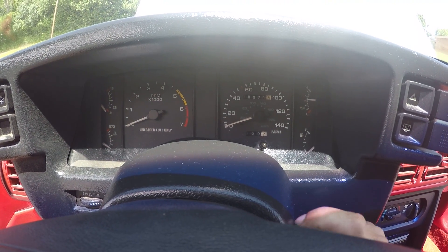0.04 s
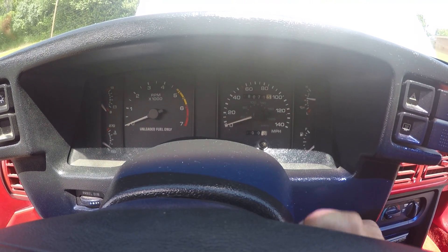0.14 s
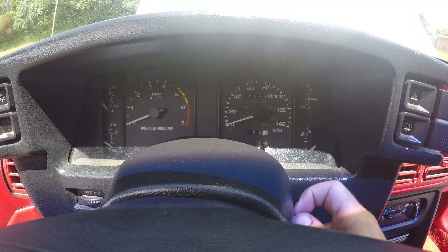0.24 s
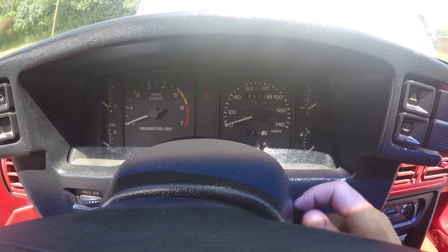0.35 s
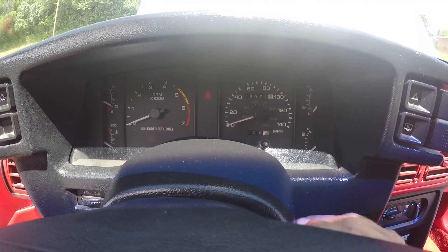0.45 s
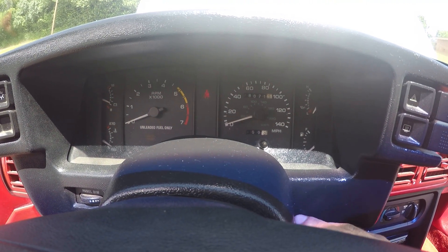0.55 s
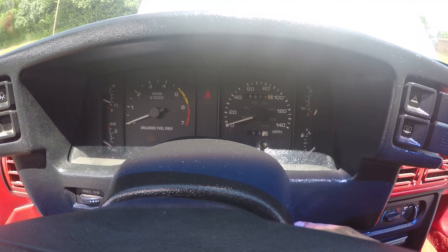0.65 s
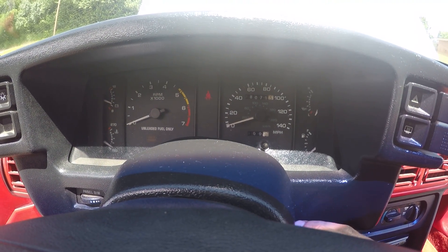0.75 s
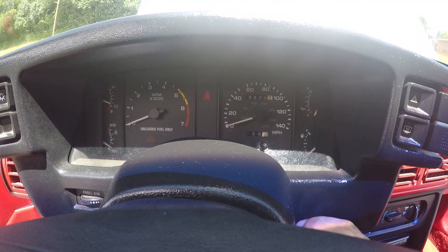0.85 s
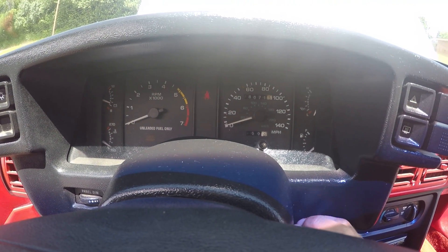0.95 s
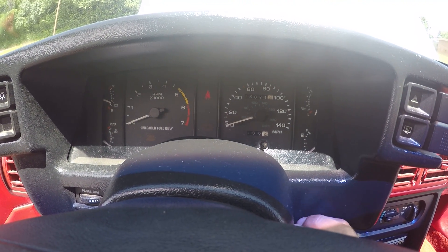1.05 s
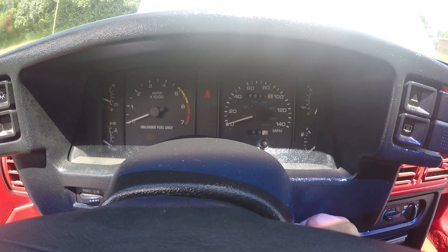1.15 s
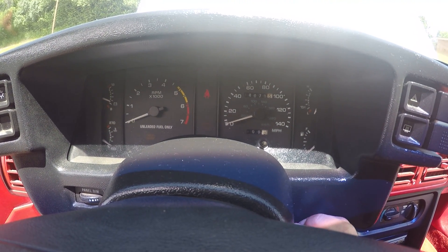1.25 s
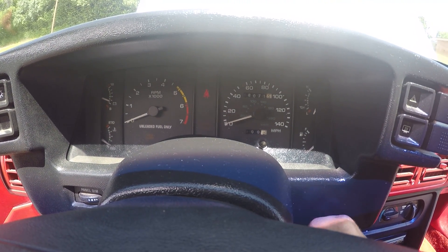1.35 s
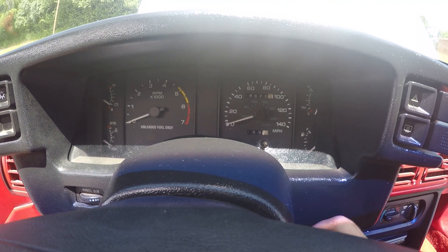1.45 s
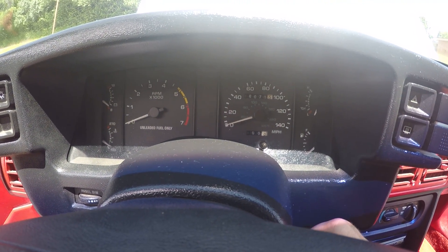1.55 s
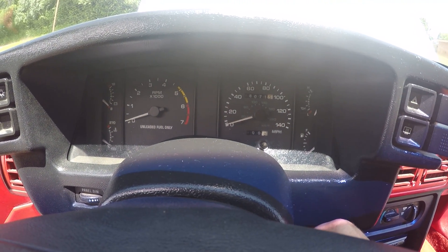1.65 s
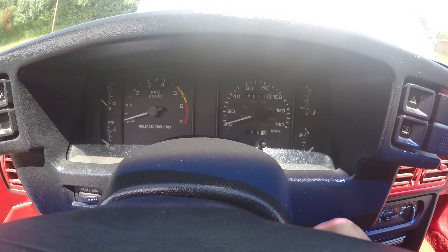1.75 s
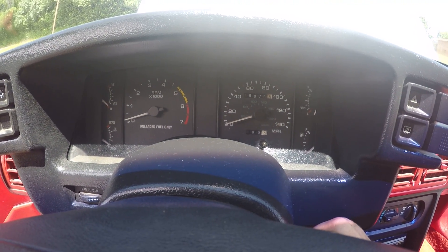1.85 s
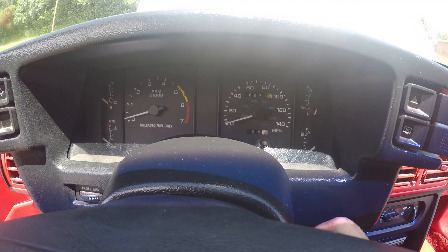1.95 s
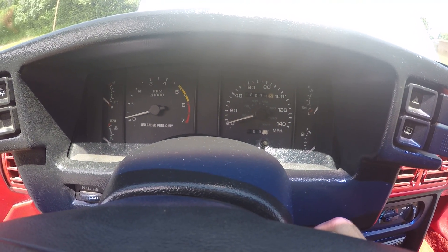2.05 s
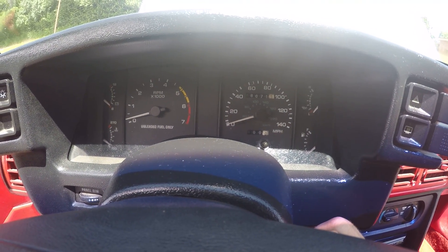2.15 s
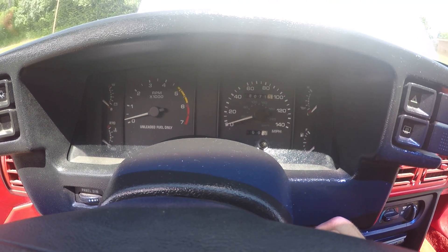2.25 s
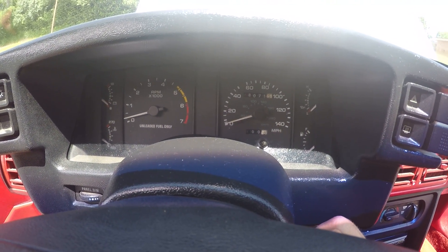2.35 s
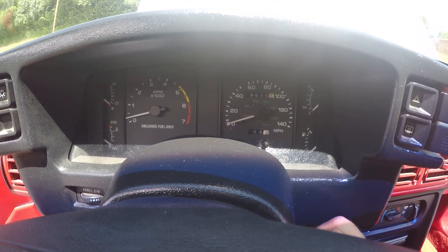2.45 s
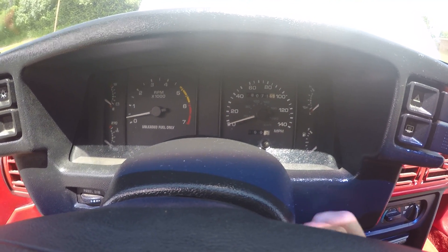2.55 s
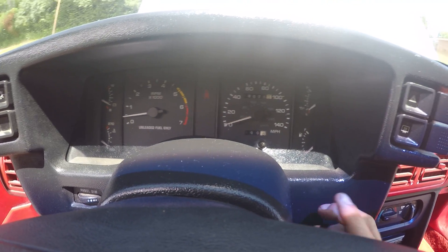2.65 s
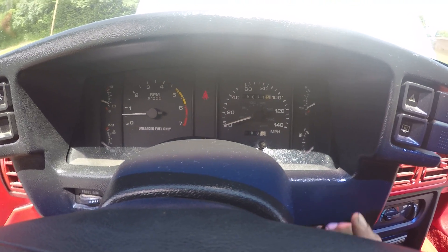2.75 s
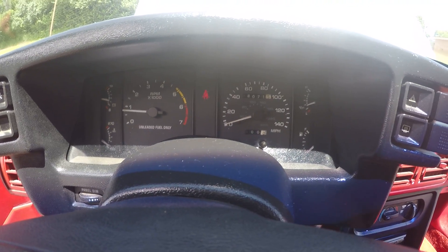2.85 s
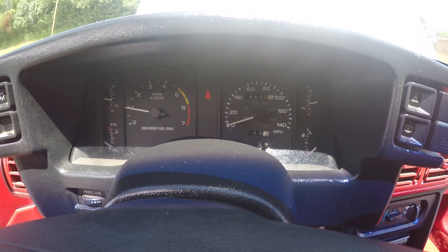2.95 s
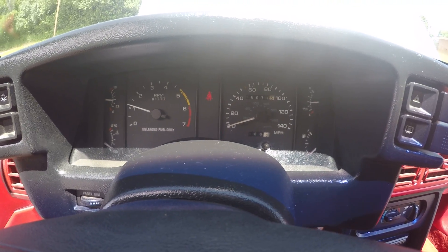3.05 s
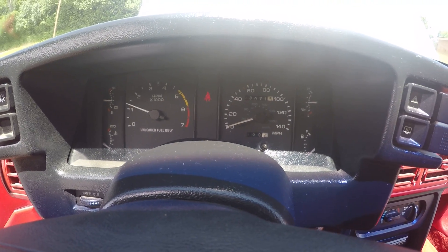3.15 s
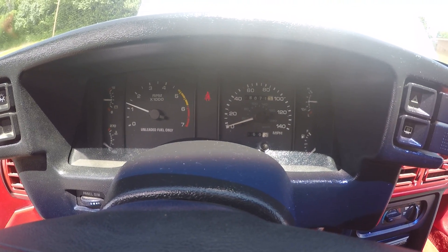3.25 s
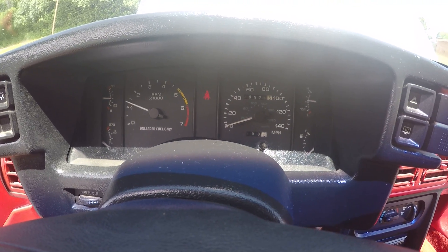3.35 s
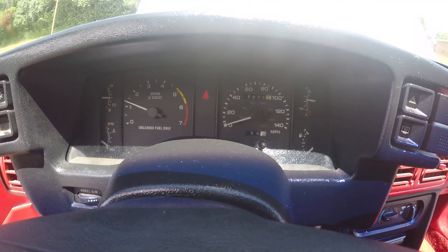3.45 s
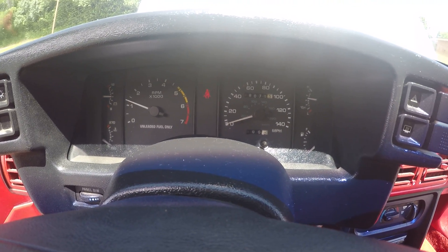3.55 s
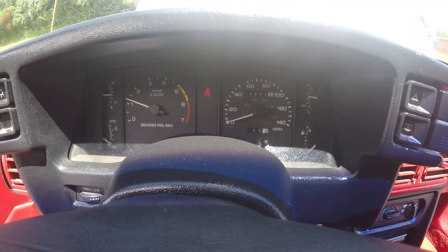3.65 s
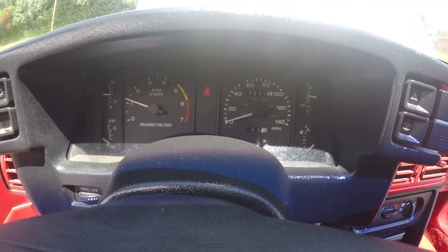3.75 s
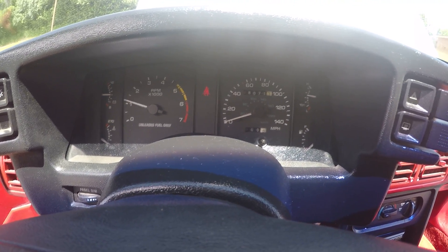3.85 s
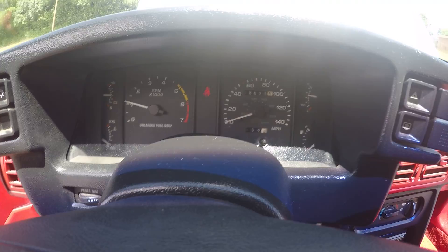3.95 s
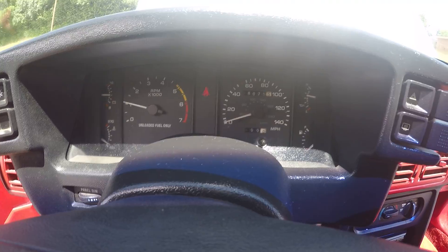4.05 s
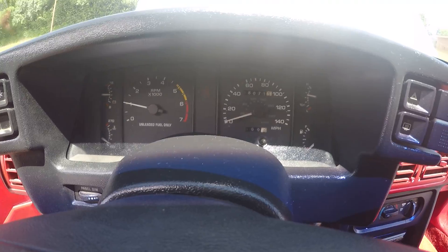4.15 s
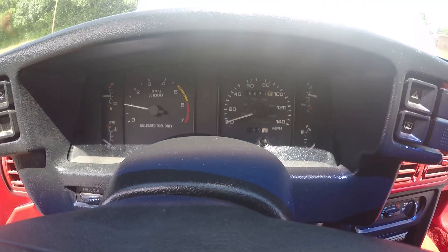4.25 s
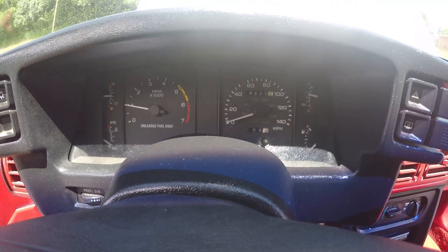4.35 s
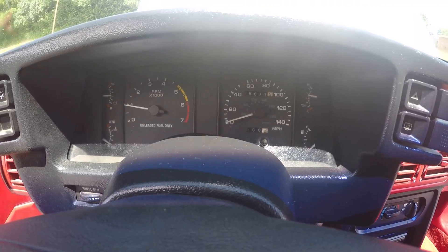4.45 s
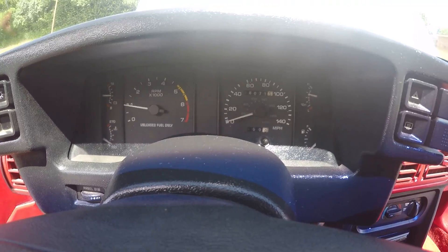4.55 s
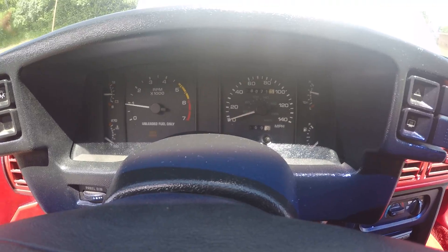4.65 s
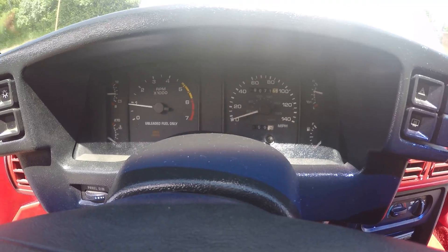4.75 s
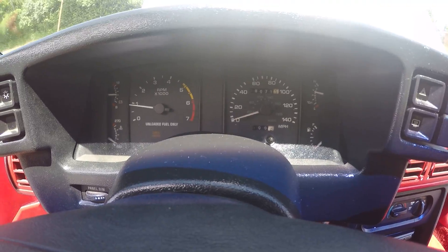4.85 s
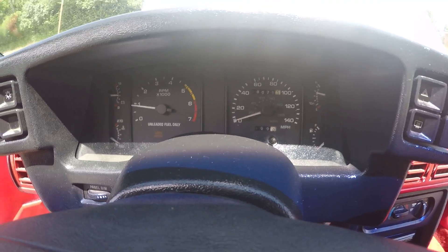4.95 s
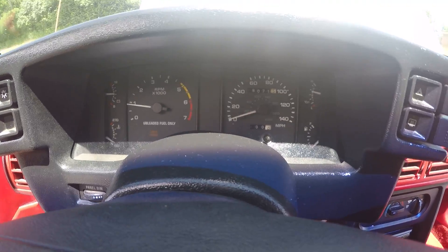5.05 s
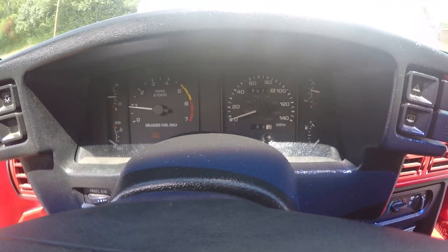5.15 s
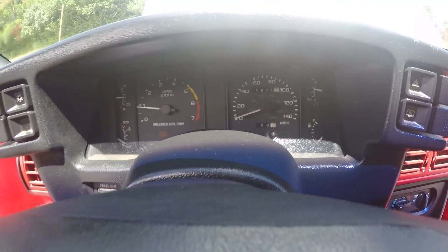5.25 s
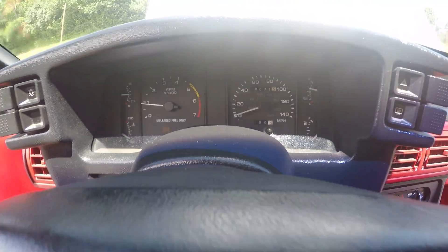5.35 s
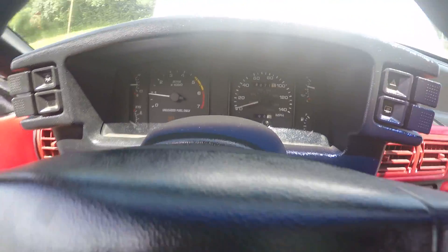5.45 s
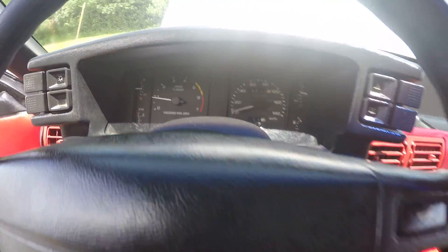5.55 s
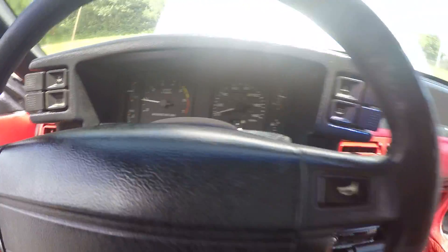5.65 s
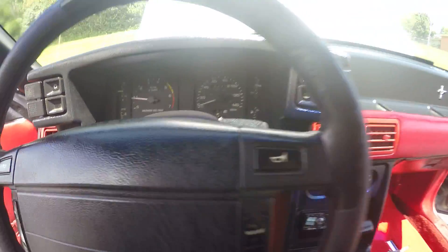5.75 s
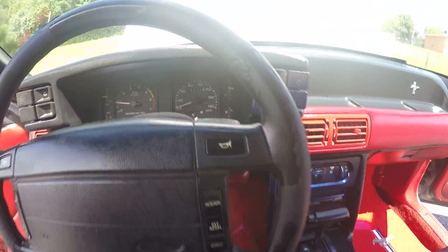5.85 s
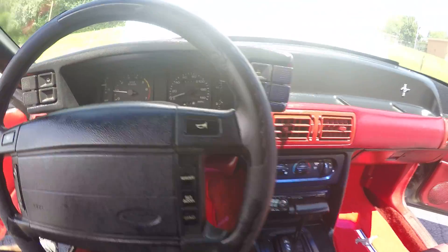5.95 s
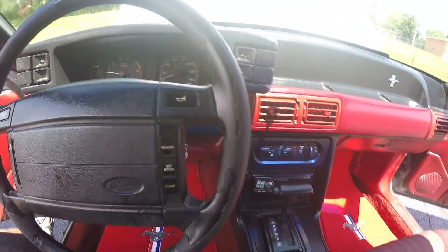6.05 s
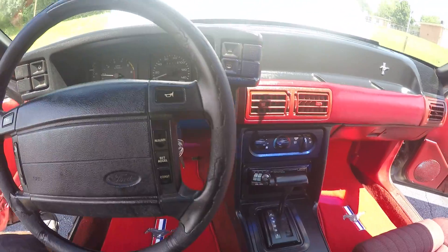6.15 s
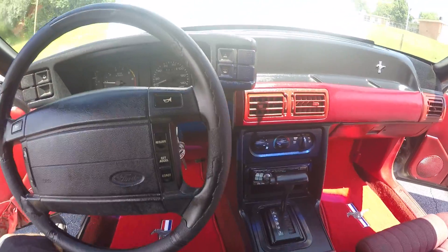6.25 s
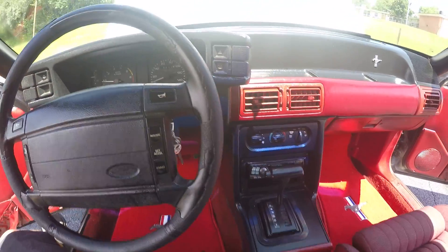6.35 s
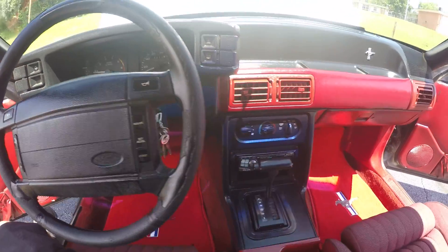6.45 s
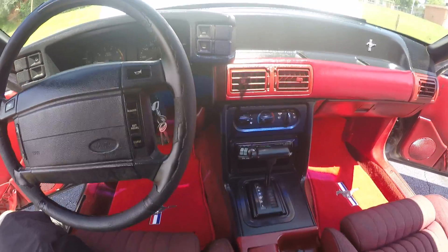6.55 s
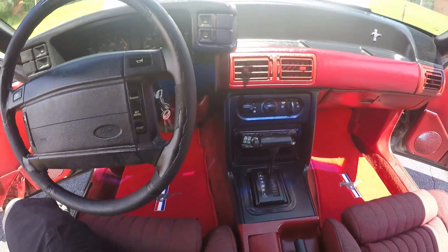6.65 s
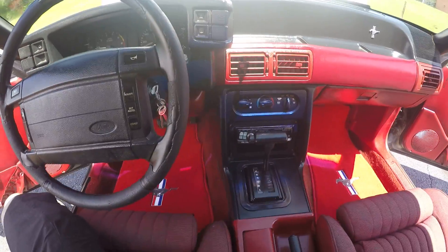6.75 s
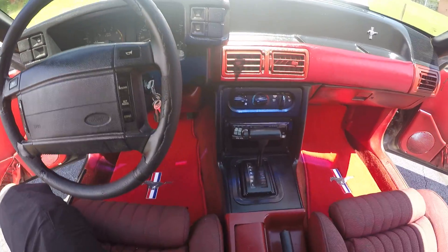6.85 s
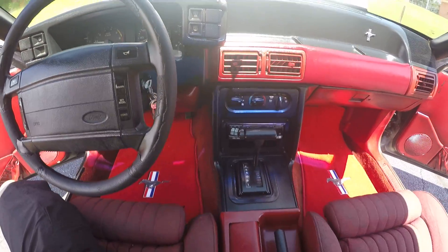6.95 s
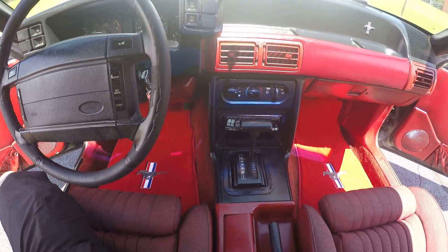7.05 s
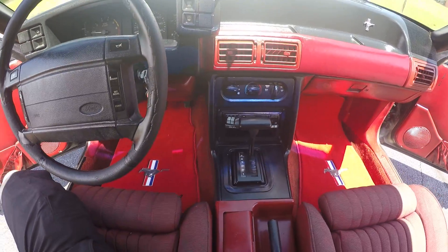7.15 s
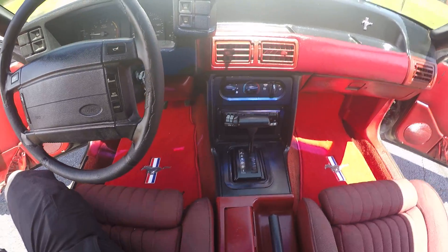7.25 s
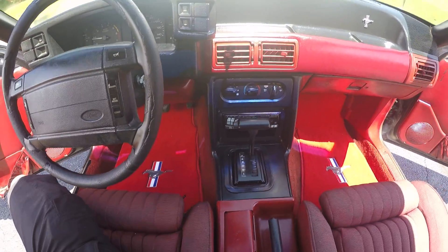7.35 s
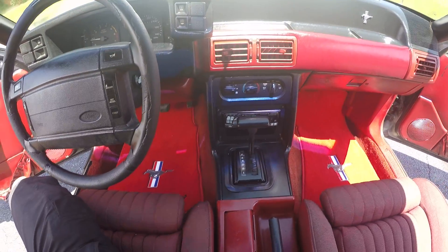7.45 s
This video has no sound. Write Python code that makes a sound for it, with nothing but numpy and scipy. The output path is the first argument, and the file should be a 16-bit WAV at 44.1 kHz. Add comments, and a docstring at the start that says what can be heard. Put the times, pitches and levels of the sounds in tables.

```python
"""A V8 is started, heard from the driver's seat with a door open.
Keys ring in modes and filtered noise rasps into the lock over a low throbbing hum; clicks are noise bursts.
The starter clunks in and grinds for a second: harmonics of meshing teeth plus scraping noise.
The engine coughs, catches, flares and sinks to a loping idle: firing tones and pulses ringing the pipe.
Faint chirps, a brush of the hand and light handling ticks at the microphone follow."""
import sys
import numpy as np
from scipy import signal
from scipy.fft import rfft, irfft, next_fast_len
from scipy.io import wavfile
from scipy.ndimage import uniform_filter1d

SR = 44100
rng = np.random.default_rng(int(sys.argv[2]) if len(sys.argv) > 2 else 0)


def file_out(sig):
    """Save sig as 16-bit WAV at sys.argv[1]."""
    # one column per channel
    cols = np.atleast_2d(sig).T
    # limit, then scale
    lim = np.clip(cols, -1, 1)
    pcm = np.round(lim * 32767).astype(np.int16)
    wavfile.write(sys.argv[1], SR, pcm)


N = 331191
T = np.arange(N) / SR
HZ = np.fft.rfftfreq(N, 1 / SR)
CUT_HZ = 15600  # upper band limit


def amp(db):
    """Turns dB into a linear gain."""
    return 10 ** (np.asarray(db) / 20)


def unit(x):
    """Scales to rms 1."""
    return x / np.sqrt(np.mean(x ** 2) + 1e-20)


def curve(rows):
    """Joins (s, value) points along time."""
    return np.interp(T, *np.transpose(rows))


def ramp(start, end):
    """Goes from 0 at start to 1 at end; with end before start it fades out."""
    return np.clip((T - start) / (end - start), 0, 1)


def swell(s, fall_s):
    """A smooth bump of height 1 at time s, down to 1/e at fall_s to either side."""
    return np.exp(-((T - s) / fall_s) ** 2)


def colour(points, hz=HZ):
    """Gain of a spectrum given as (Hz, dB) points."""
    f, db = np.transpose(points)
    return amp(np.interp(np.log(hz + 1), np.log(f + 1), db))


def peaks(modes):
    """Gain of steep-sided resonances given as (Hz, width Hz, dB)."""
    gain = 0
    for f, width, db in modes:
        detuning = (HZ ** 2 - f ** 2) / (width * (HZ + f))
        gain = gain + amp(db) / (1 + detuning ** 2 * 2) ** 1.5
    return gain


def causal(gain):
    """Gives a gain curve the phase of a body that rings after it is struck."""
    cepstrum = irfft(np.log(np.maximum(gain, gain.max() * 1e-5)), N)
    fold = 1 + np.sign(N / 2 - np.arange(N)) * (T > 0)  # doubles the causal half, drops the other
    return np.exp(rfft(cepstrum * fold))


def shaped(x, gain):
    """Filters x by a gain curve."""
    size = next_fast_len(N + SR // 2)
    response = np.interp(np.fft.rfftfreq(size, 1 / SR), HZ, gain)
    return irfft(rfft(x, size) * response, size)[:N]


def noise(gain):
    """Noise of rms 1 with the given spectrum."""
    return unit(shaped(rng.standard_normal(N), gain))


def wander(hz):
    """Slow chance of rms 1, up to about the given rate."""
    f = np.fft.rfftfreq(16384, 1 / 2000)
    slow = irfft(rfft(rng.standard_normal(16384)) / (1 + (f / hz) ** 4))
    return unit(np.interp(T * 2000, np.arange(len(slow)), slow))


def levelled(x, size=SR // 7):
    """Holds the rms near 1 and keeps flutter quicker than the window of size samples."""
    return x / np.sqrt(abs(uniform_filter1d(x ** 2, size=size)) + 1e-12)


def add(mix, s, sound):
    """Mixes a sound in at time s."""
    part = mix[max(round(s * SR), 0):][:len(sound)]
    part += sound[:len(part)]


# Faint outdoor air through the open door. Each row: frequency in Hz, level in dB.
AIR_COLOUR = [(41, -34), (70, -9.5), (129, -19.5), (325, -26.5), (478, -38.5), (1100, -42), (15500, -71)]
AIR_DB = -39


def surroundings(hum_hz=57.95, beat_hz=8.5, beat=0.32, throb_db=-36, hum_db=-28):
    """A wavering hum, pulsing about eight times a second, over a resonant low throb and faint outdoor air."""
    hum = np.sqrt(2) * np.sin(2 * np.pi * np.cumsum(hum_hz * (1 + 0.007 * wander(10.5))) / SR)
    hum *= 1 + beat * np.sin(2 * np.pi * np.cumsum(beat_hz * (1 + 0.2 * wander(2.5))) / SR)
    hum *= amp(hum_db) * ramp(2.6, 1.16)
    throb = noise(peaks([(46.7, 11, 4.0), (28, 9.0, -4.5), (109, 25, -6.5), (163.0, 28, -13), (228.5, 25, -14)]))
    return hum + amp(throb_db) * throb + amp(AIR_DB) * noise(colour(AIR_COLOUR))


# Keys knocking on their ring, close by.
# Each row: start in seconds, relative level in dB, frequency struck hardest in Hz, ring length as a share.
JINGLES = [(0.02, -32, 10500, 0.47), (0.12, -50, 5860, 1.3), (0.182, -35, 11000, .6),
           (.243, -27, 11600, 0.55), (.326, -18.5, 14000, 1.4), (0.406, -26.5, 14000, 0.8),
           (0.437, -19.5, 11500, 0.76), (0.455, -26, 11600, 1.25), (0.595, -34, 7400, 0.69),
           (0.654, -31.5, 11600, 1), (0.719, -25.5, 5600, 0.47), (0.819, -25.5, 7440, 0.4),
           (0.967, -36, 6350, 1.2), (1.006, -28, 11800, 0.51), (1.155, -57, 7000, 0.67)]
# Ringing modes of the keys. Each row: frequency in Hz, level in dB, seconds to fall 60 dB at full ring length.
KEY_MODES = [(2140, -26, 0.12), (2342, -7, 0.1), (5540, -8, 0.12), (5710, -6, 0.13), (6380, -11.5, 0.28),
             (6950, -14, .15), (7250, -6, 0.22), (7450, -5, 0.19), (10900, -8, .09), (11560, -0.5, .12),
             (11500, -7, 0.14), (13980, -5, 0.11), (14350, -12, .1)]
# Colour of the blade sliding into the lock. Each row: frequency in Hz, level in dB.
SLIDE_COLOUR = [(240, -46), (400, -7.5), (496, 0.5), (928, -11.5), (7210, -16.5), (8530, -27),
                (11800, -15.5), (15500, -26)]
# The key blade rasps over the pins.
# Each row: centre in seconds, seconds to fall to 1/e, dB over its steady scraping.
RASPS = [(0.253, 0.036, 23.4), (0.464, 0.024, 18.3)]
SCRAPE_DB = -50.5
SWAY_COUNT, SWAY_DB = 16, -48.5  # the bunch sways, and keys touch lightly between knocks (dB relative)


def keys(ring_db=-11, spread_db=4.5, detune=0.001, chatter_s=.012, bounce_db=-7, tick_db=-9,
         tick_t60=0.061, grain_db=3, focus_db=7, focus_octaves=0.083):
    """At each knock the keys bounce and ring their modes unevenly; the blade scrapes into the lock."""
    out, knocks, t = np.zeros(N), np.zeros(N), T[:SR // 3]
    hz, mode_db, t60 = np.transpose(KEY_MODES)[:, :, None]
    touches = []
    for s, which in rng.random((SWAY_COUNT, 2)):
        struck_hz = KEY_MODES[int(which * len(KEY_MODES))][0]
        touches.append((s * JINGLES[-1][0], SWAY_DB, struck_hz, 1))
    attack = 1 - np.exp(-t / 0.00037)
    for s, db, struck_hz, length in list(JINGLES) + touches:
        struck_db = mode_db + focus_db * np.exp(-(np.log2(hz / struck_hz) / focus_octaves) ** 2)
        for bounce in range(3):
            size, shift, phase = rng.standard_normal((3, len(KEY_MODES), 1))
            decay = amp(struck_db + spread_db * size - 60 * t / (t60 * length))
            ring = np.sin(2 * np.pi * (hz * (1 + detune * shift) * t + phase)) * decay
            when = s + bounce * chatter_s * rng.uniform(0.43, 1.6)
            level = amp(db + ring_db + bounce * bounce_db)
            add(out, when, level * ring.sum(0) * attack)
            add(knocks, when, level * amp(tick_db - 60 * t / tick_t60))
    # noise stands in for the many short-lived modes
    shimmer = knocks * noise(colour([(1500, -25), (5500, 6), (9000, -1), (12000, 6), (16000, -14)]))
    rasp = unit(noise(colour(SLIDE_COLOUR)) * amp(grain_db * wander(270)))
    pressure_db = SCRAPE_DB + sum(db * swell(s, fall_s) for s, fall_s, db in RASPS)
    return out + shimmer + rasp * amp(pressure_db) * ramp(0.18, 0.182) * ramp(0.59, 0.548)


# Lock, solenoid and pinion clicks.
# Each row: time in seconds, relative level in dB, brightness in dB per octave.
CLICKS = [(0.079, -41.5, -0.5), (0.197, -27, -8.5), (0.225, -27.5, -3), (0.301, -23.5, 5.5),
          (0.317, -25.5, -6), (0.356, -27, -2.5), (0.49, -27, -5.5), (0.514, -24.5, -4.5), (0.524, -19, -4),
          (0.551, -28, -17), (0.574, -24, -4), (0.633, -32, 14), (0.666, -26, 2), (0.671, -16, -1.5),
          (0.675, -22.5, -2.5), (0.716, -28, 12), (0.812, -42, 7), (0.818, -22.5, -4), (0.869, -29, 11),
          (0.93, -33.5, 3.5), (0.964, -30, -5.5), (1.103, -33.5, -3), (1.121, -37, -2.5),
          (1.405, -33.5, 3.5), (1.458, -30, -2.5), (2.641, -20, 7.5), (2.645, -19, 2.5)]
# Colour that the clicks share. Each row: frequency in Hz, level in dB.
CLICK_COLOUR = [(250, -39), (550, 1.5), (1100, 0.5), (3000, -1), (9000, -18.5), (15000, -22.5)]


def clicks(click_db=-1, light_touch=0.19, rise_s=0.001085, t60=0.042, treble_t60=0.03, touch_db=-15,
           touch_s=0.0027, tail_db=-26, tail_t60=0.18):
    """Parts rub for an instant, then snap; the treble dies before the body of the lock or trim."""
    out, lead_s = np.zeros(N), .02
    t = T[:SR // 5] - lead_s
    hz = np.fft.rfftfreq(len(t), 1 / SR)
    before, after = np.minimum(t, 0), np.maximum(t, 0)
    low = 1 / (1 + (hz / 2800) ** 4)
    onset = np.exp(before / rise_s) + amp(touch_db) * np.exp(before / touch_s)
    tail = amp(tail_db - 60 * after / tail_t60)
    loudest_db = np.max(CLICKS, axis=0)[1]
    for s, db, bright_db in CLICKS:
        gain = colour(CLICK_COLOUR, hz) * amp(bright_db * np.log2(np.clip(hz, 700, 9000)))
        spectrum = rfft(rng.choice([-1, 1], len(t))) * unit(gain)
        length = amp(light_touch * (db - loudest_db))  # lighter clicks die sooner
        crack = 0
        for band, ring_s in ((low, t60), (1 - low, treble_t60)):
            decay = amp(-60 * after / (ring_s * length)) + tail
            crack = crack + irfft(spectrum * band, len(t)) * decay
        add(out, s - lead_s + rise_s, amp(db + click_db) * crack * onset)
    return out


def fumbling(ticks_per_s=80, fumble_db=-46, spread_db=4, t60=0.037):
    """The key and its fob tap lightly and at random against the lock: decaying bursts of coloured noise."""
    taps = (rng.random(N) < ticks_per_s / SR) * amp(spread_db * np.clip(rng.standard_normal(N), -2, 2))
    fade = signal.fftconvolve(taps, amp(-60 * T[:SR // 10] / t60))[:N]
    plastic = noise(colour([(200, 0), (500, 1), (900, 7), (1600, -2), (3500, -3.0), (9000, -13), (15000, -18)]))
    return amp(fumble_db) * unit(fade * plastic) * ramp(0.171, 0.179) * ramp(1.28, 0.51)


def teeth(turns, flutter_db, count):
    """Harmonics of meshing teeth; each one flutters as the contact shifts."""
    total = np.zeros(N)
    for k in range(1, count):
        total += np.cos(2 * np.pi * (k * turns + rng.random())) * amp(flutter_db * wander(19.6))
    return unit(total)


def bay_reflections(x, wet_db, t60):
    """Dense, short reflections in the engine bay smear x."""
    t = T[:SR // 4]
    tail = rng.standard_normal(len(t)) * amp(-60 * t / t60) * (t > .002)
    return x + amp(wet_db) * signal.fftconvolve(x, tail / np.linalg.norm(tail))[:N]


# Colour of the starter's housing and the bulkhead. Each row: frequency in Hz, level in dB.
STARTER_BODY = [(200, -10), (350, -5.5), (460, -7.5), (600, -1), (750, -8.5), (900, 1), (1070, 1),
                (1250, -6.5), (1800, -6), (2300, -6), (2900, -7.5), (4100, -5.5), (7600, -23.5),
                (11000, -36), (15500, -47)]
# What the housing rings with, over that colour. Each row: frequency in Hz, width in Hz, level in dB.
STARTER_RINGS = [(996, 28, -5), (1070, 44, 0), (2302, 39, -10), (4071, 60, -10)]
# Each compression stroke drags the starter down, less so as it spins up.
# Each row: time in seconds, mean teeth meshing per second.
STARTER_SPEED = [(1.48, 250), (1.55, 312), (1.58, 360), (1.62, 346), (1.672, 224), (1.7, 224), (1.75, 412),
                 (1.815, 326), (1.855, 498), (1.885, 478), (1.915, 426), (1.945, 572), (2.012, 588),
                 (2.065, 402), (2.115, 512), (2.15, 462), (2.195, 556), (2.26, 596), (2.29, 558),
                 (2.35, 596), (2.41, 510), (2.46, 640), (2.65, 680), (2.9, 430)]
REFERENCE_HZ = 580  # teeth per second at which grind and fizz have their stated level
UNSTEADY, UNSTEADY_HZ = .02, 45  # wobble of the starter's speed: share, rate in Hz
BAY_WET_DB, BAY_T60 = 1, .1  # reflections in the engine bay: dB, seconds to fall 60 dB
TOOTH_FLUTTER_DB, SHAFT_DB = 5, -2  # the teeth meet unevenly; the motor shaft adds its own whine


def starter(grit=0.4, grind_grit=0.63, rattle_db=1.5, whine_db=-29.0, grind_db=-29, fizz_db=-42.5,
            grind_db_per_octave=5, fizz_db_per_octave=10,
            whine_free_db=-5.0, grind_free_db=-7.0, fizz_free_db=-1):
    """Pinion and ring gear whine and scrape, harsher the faster they turn, then softer as they run free."""
    hz = uniform_filter1d(curve(STARTER_SPEED), size=SR // 80)
    octaves = np.log2(hz / REFERENCE_HZ)
    free = ramp(2.37, 2.41)
    turns = np.cumsum(hz * (1 + UNSTEADY * wander(UNSTEADY_HZ))) / SR
    gear = teeth(turns, TOOTH_FLUTTER_DB, count=15)
    shaft = amp(SHAFT_DB) * teeth(turns / 3, TOOTH_FLUTTER_DB, count=34)
    lines = unit(bay_reflections(gear + shaft, BAY_WET_DB, BAY_T60)) * (1 - 0.59 * free)
    contact = 1.4 + np.exp(-(turns % 1) / 0.26)  # each tooth scrapes hardest as it meets
    scrape = 2 * unit(rng.standard_normal(N) * contact * amp(rattle_db * wander(68)))
    body = colour(STARTER_BODY) * (1 + peaks(STARTER_RINGS))
    low, high = 1 / (1 + (HZ / 1400) ** 8), 1 - 1 / (1 + (HZ / 6000) ** 8)
    whine = levelled(shaped(lines + grit * scrape, body * low))
    whine = whine * amp(whine_db + whine_free_db * free)
    grind = levelled(shaped(lines + grind_grit * scrape, body * (1 - low - high)))
    grind = grind * amp(grind_db + grind_db_per_octave * octaves + grind_free_db * free)
    fizz = unit(shaped(scrape, body * high))
    fizz = fizz * amp(fizz_db + fizz_db_per_octave * octaves + fizz_free_db * free)
    meshed = ramp(2.728, 2.678)  # the pinion pulls out, and the motor coasts on
    return (whine * ramp(2.87, 2.58) + (grind + fizz) * meshed) * ramp(1.47, 1.49)


def solenoid(clunk_db=-13, t60=0.14):
    """The pinion slams into the ring gear: one decaying burst of coloured noise."""
    gain = colour([(60, -1.0), (120, 11.5), (300, 1.5), (650, -5), (890, 3.5), (1100, -4.5), (2200, -6),
                   (4500, -6), (7000, -14.5), (15000, -30)])
    decay = amp(clunk_db - 60 * np.maximum(T - 1.485, 0) / t60)
    return noise(gain) * ramp(1.474, 1.485) * decay


# Exhaust and cabin resonances. Each row: frequency in Hz, width in Hz, level in dB.
EXHAUST = [(56.94, 19.4, 5), (91, 27.5, -0.5), (127.84, 13, 6), (181.5, 26, -17.5), (224.9, 20.4, -9),
           (271.8, 22.5, -14), (372, 28, -37.5)]
# Jolts and first firings in the exhaust. Each row: start in seconds, relative level in dB.
COUGHS = [(1.496, -3), (1.569, -7.5), (1.621, -10), (2.07, -8), (2.155, -6), (2.257, -8.5), (2.445, -8.5),
          (2.477, -3.5), (2.498, -1.5), (2.514, -3.5), (2.551, -9), (2.615, -3.5), (2.696, -1.5)]


def cranking(rumble_db=-24, firing_db=11, cough_db=-1.5, boom_db=-7):
    """The block rocks on its mounts, harder as cylinders begin to fire; firings thump down the pipe."""
    pipe = causal(colour([(10, -15), (26, -1.0), (52, -4.5), (75, -6.0), (125, -9.0), (165, -20.0),
                          (230, -25.0), (320, -33.0), (600, -42.5), (2000, -91)]))
    rumble = levelled(noise(abs(pipe))) * amp(rumble_db + firing_db * ramp(2.13, 2.84))
    out = rumble * ramp(1.48, 1.49) * ramp(2.72, 2.684)
    thump = irfft(causal(abs(pipe) + amp(boom_db) * peaks(EXHAUST[:1])), N)[:SR // 4]
    for s, db in COUGHS:
        add(out, s, amp(db + cough_db) * thump / abs(thump).max())
    return out


# The engine flares and sinks to idle. Each row: time in seconds, mean firings per second.
SPEED = [(2.68, 44.7), (2.79, 58.2), (2.89, 70), (2.97, 84.5), (3.07, 102), (3.22, 90), (3.34, 92),
         (3.8, 80), (3.92, 68.7), (4.12, 67.5), (4.3, 65.3), (4.5, 63), (4.7, 60.1), (4.95, 60.8),
         (5.16, 59.6), (5.75, 59.6), (6.5, 56.6), (6.65, 57.4), (7.28, 53.8), (7.5, 55.2)]


def engine_speed():
    """Firings per second, with a slight slow wander."""
    return curve(SPEED) * (1 + 0.007 * wander(6.8))


# Valve clatter. Each row: frequency in Hz, level in dB.
BAY_COLOUR = [(180, -35.5), (300, -8.5), (376, -3.5), (421, -32), (489, -2.5), (569, -18), (621, -11.5),
              (778, -17), (5000, -24.5), (6000, -31), (7800, -57), (13200, -120)]
# Fan hiss. Each row: frequency in Hz, level in dB.
HISS_COLOUR = [(2940, -25), (5000, -3.5), (8340, -6), (10400, -16), (14000, -15), (15500, -25)]
# Ringing of the engine bay. Each row: frequency in Hz, width in Hz, level in dB.
BAY_RINGS = [(374.5, 12, -1), (495.5, 11, 3), (615, 24, 0.5), (967, 37, -3), (1518, 14, -8), (2050, 18, -5),
             (2340, 760, -13.5)]
CATCH_S, SETTLE_S = 2.75, 0.37  # the engine bay is loudest at the catch, then settles
LEAN_BACK_S = 5.2  # the listener leans back from the wheel, and more hiss gets through


def engine_bay(firings, clatter_db=-48.0, rings_db=-54, hiss_db=-65.0, catch_db=10, catch_hiss_db=17,
               lean_db=10.0, lean_fade_db_per_s=1.5, beat=0.36, tick_decay=0.6):
    """Valve clatter and fan noise pulse with each firing, over a steadier ringing of the bay."""
    tick = unit(np.exp(-(firings % 1) / tick_decay))
    pulse = unit(1 + beat * (1 + 0.66 * wander(30)) * tick)
    clatter = amp(clatter_db) * noise(colour(BAY_COLOUR)) * pulse
    clatter = clatter + amp(rings_db) * noise(peaks(BAY_RINGS))
    hiss = amp(hiss_db) * noise(colour(HISS_COLOUR)) * pulse
    fresh = np.exp(-np.maximum(T - CATCH_S, 0) / SETTLE_S)
    leaning_db = lean_db - lean_fade_db_per_s * (T - LEAN_BACK_S)
    leaning_db = leaning_db * ramp(LEAN_BACK_S - .05, LEAN_BACK_S + .05)
    bay = clatter * amp(catch_db * fresh) + hiss * amp(catch_hiss_db * fresh + leaning_db)
    return bay * ramp(2.51, 2.65)


# Strength of the cylinders in firing order; their mean is taken off. Each entry: a share.
CYLINDERS = [0.8, -0.69, .8, .7, -0.78, 0.84, -0.62, -.7]
# How strongly pipe and cabin boom at a firing tone. Each row: frequency in Hz, level in dB.
BOOM = [(44, -18), (53, -13.5), (59, -15), (66, -19), (72, -21.5), (83, -19.5), (98, -16), (108, -25.5),
        (118, -17), (126, -12), (133, -13), (143, -21.5), (155, -39), (180, -46)]
# Strong firings make the engine surge, weak ones make it stumble.
# Each row: centre in seconds, seconds to fall to 1/e, change of effort in dB.
SURGES = [(2.74, 0.044, 1.5), (2.95, 0.057, 2), (3.151, 0.041, -7.5), (3.92, 0.1, 2), (5.54, 0.024, -5),
          (5.806, 0.022, -6)]
# The lope from the unequal cylinders. Each row: time in seconds, level in dB before the effort.
LOPE = [(2.7, -27.5), (3.05, -21), (3.3, -16.5), (3.95, -17), (4.4, -20.5), (5.5, -24), (6.3, -24.5),
        (7.5, -25)]
# The bark in the pipe's upper resonances. Each row: time in seconds, level in dB.
BARK = [(2.7, -36.5), (2.9, -33), (3.5, -29), (3.95, -33.5), (4.3, -32.5), (4.7, -38.5), (5.6, -40),
        (6.2, -43.5), (7.5, -46.5)]
UNEVEN = .58  # chance in the strength of each firing (share)


def exhaust(hz, firings, tone_db=1.5, octave_db=-2.5, push_db=0.74, overtones=0.0018, waver_db=1.34):
    """Even firings make a tone and its octave; unequal cylinders ring the pipe and make it lope and bark."""
    pipe_phase = np.unwrap(np.angle(causal(peaks(EXHAUST))))
    octaves_per_s = uniform_filter1d(np.gradient(np.log2(hz)) * SR, size=SR // 8)
    push = np.maximum(octaves_per_s, 0)  # only a rising speed adds effort
    effort = amp(push_db * push + sum(db * swell(s, fall_s) for s, fall_s, db in SURGES))
    even = 0
    for k, level_db in ((1, tone_db), (2, octave_db)):
        wave = np.cos(2 * np.pi * k * firings + np.interp(k * hz, HZ, pipe_phase))
        even = even + amp(level_db) * colour(BOOM, k * hz) * wave
    even = np.sqrt(2) * effort * even
    at = np.flatnonzero(np.diff(np.floor(firings)))
    strengths = np.resize(CYLINDERS - np.mean(CYLINDERS), len(at))
    pulses = np.zeros(N)
    pulses[at] = strengths + UNEVEN * rng.standard_normal(len(at))
    fronts = overtones * sum(np.cos(2 * np.pi * k * firings) for k in range(3, 7))
    lope = levelled(shaped(pulses, causal(peaks(EXHAUST[:3]))))
    lope = lope * amp(curve(LOPE)) * np.sqrt(effort)
    bark = levelled(shaped(pulses + fronts, causal(peaks(EXHAUST[3:])))) * amp(curve(BARK))
    # strokes vary, but the engine's output holds
    power = abs(uniform_filter1d(even ** 2 + lope ** 2, size=SR // 12))
    strokes = levelled(even * amp(waver_db * wander(24)) + lope, size=SR // 11) * np.sqrt(power)
    return (strokes + bark) * ramp(2.66, 2.7)


# Faint, thin chirps. Each row: centre in seconds, mean pitch in Hz.
CHIRPS = [(5.08, 5180), (5.42, 5100), (5.84, 4780), (6.39, 5200), (6.85, 4740), (7.1, 5200), (7.21, 4900),
          (7.43, 4850)]


def chirps(chirp_db=-55, fall_s=.018):
    """Short, wavering whistles, barely above the idle: swelling sines with a random bend."""
    bend = 1 + .012 * wander(120)
    out = np.zeros(N)
    for s, hz in CHIRPS:
        out += swell(s, fall_s) * np.sin(2 * np.pi * np.cumsum(hz * bend) / SR)
    return amp(chirp_db) * out


def brush(brush_db=-43.5, grain_db=2):
    """A hand brushes past as the listener leans back: a short swell of grainy noise."""
    stroke = swell(5.266, .013)
    cloth = noise(colour([(300, -14), (1000, -8), (4500, 5), (8000, -1), (15000, -26)]))
    return amp(brush_db) * stroke * unit(amp(grain_db * wander(200)) * cloth)


# Dry handling ticks right at the microphone.
# Each row: start in seconds, peak level in dB, lowest frequency in Hz.
TICKS = [(5.5095, -19, 3200), (5.6405, -22.5, 4500), (5.69, -18, 900)]


def ticks(top_hz=10500):
    """Single snaps of plastic right at the microphone, with no ring: band-passed impulses."""
    out = np.zeros(N)
    for s, db, low_hz in TICKS:
        band = signal.butter(2, [low_hz, min(top_hz, CUT_HZ)], "bandpass", fs=SR, output="sos")
        snap = signal.sosfilt(band, np.eye(1, SR // 100)[0])
        add(out, s, amp(db) * snap / abs(snap).max())
    return out


def scene():
    """Key, starter and engine in turn, over the sounds outside."""
    hz = engine_speed()
    firings = np.cumsum(hz) / SR
    ignition = keys() + clicks() + fumbling()
    start = starter() + solenoid() + cranking()
    engine = engine_bay(firings) + exhaust(hz, firings)
    handling = brush() + ticks()
    return (surroundings() + ignition + start + engine + chirps() + handling)[None]


def record(dry):
    """The microphone sheds the deepest bass; a brief closing fade and the upper band limit follow."""
    x = signal.sosfilt(signal.butter(2, 18, "highpass", fs=SR, output="sos"), dry)
    x = x * np.minimum((T[-1] - T) / .008, 1)
    band_limit = signal.firwin(401, CUT_HZ, window=("kaiser", 9), fs=SR)
    return signal.oaconvolve(x, band_limit[None], "same")


dry = scene()
out = record(dry)
file_out(out)
```